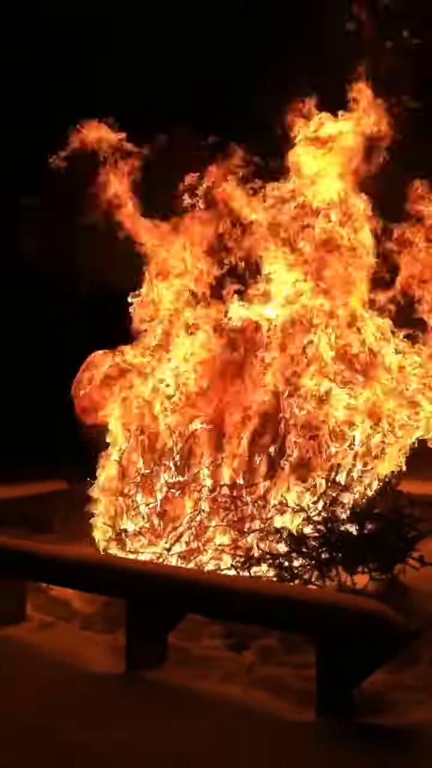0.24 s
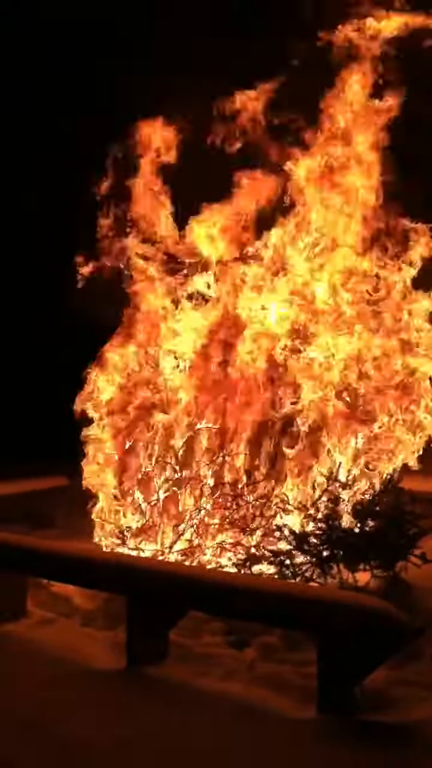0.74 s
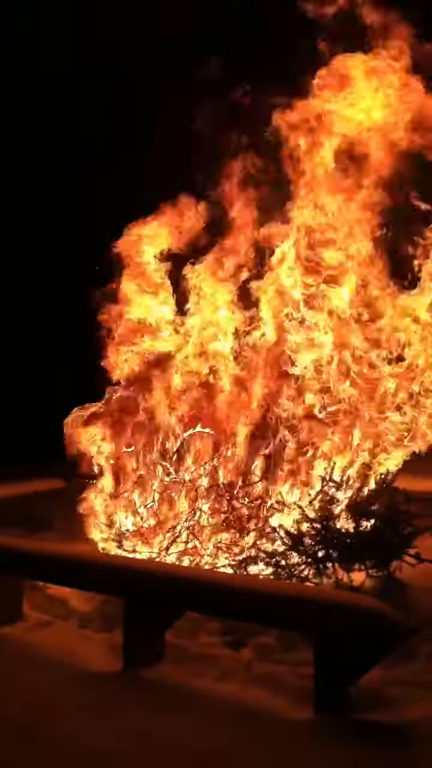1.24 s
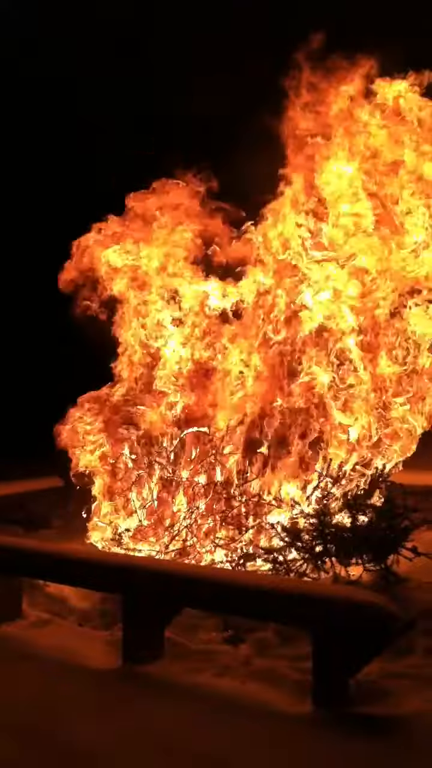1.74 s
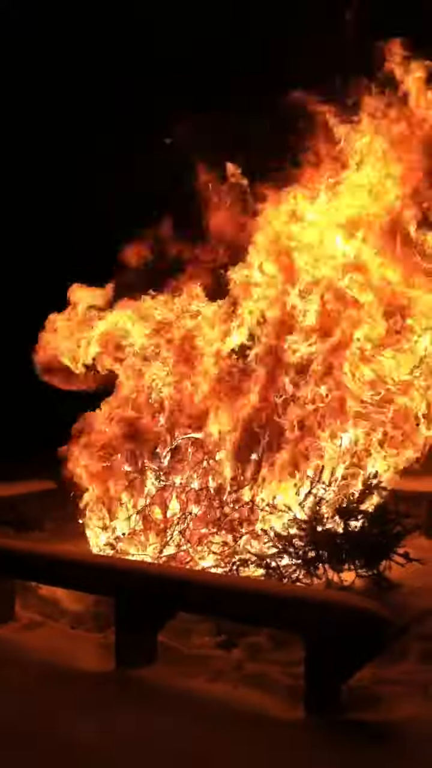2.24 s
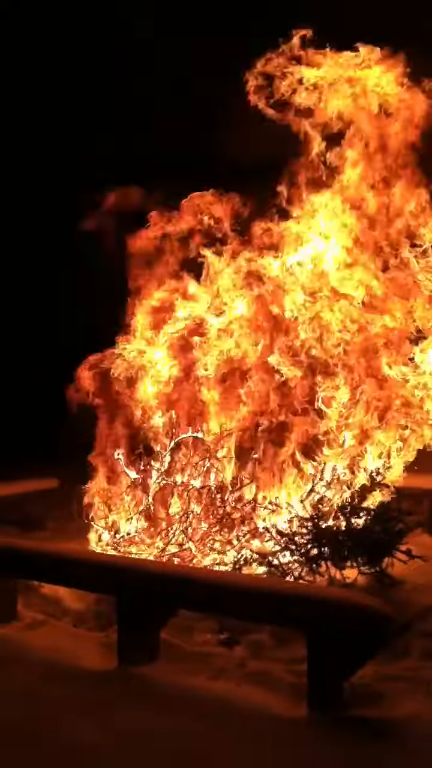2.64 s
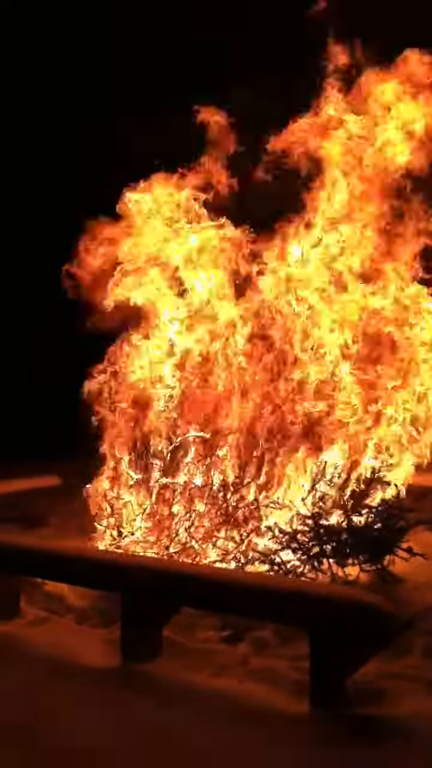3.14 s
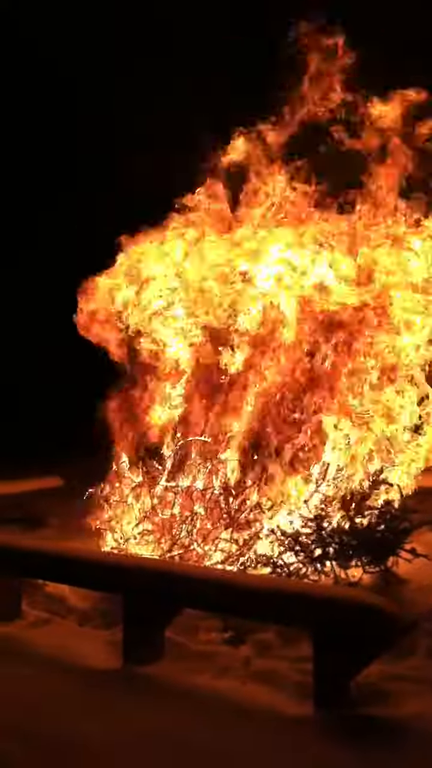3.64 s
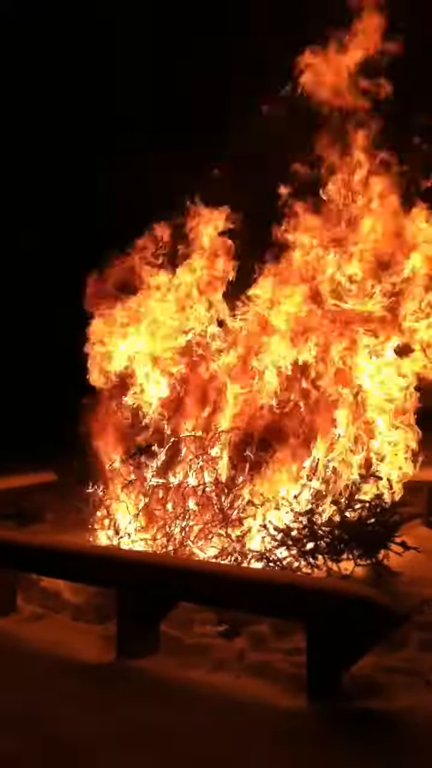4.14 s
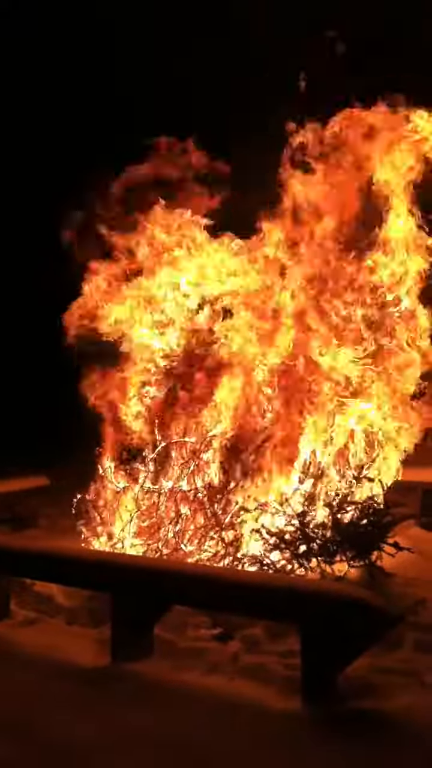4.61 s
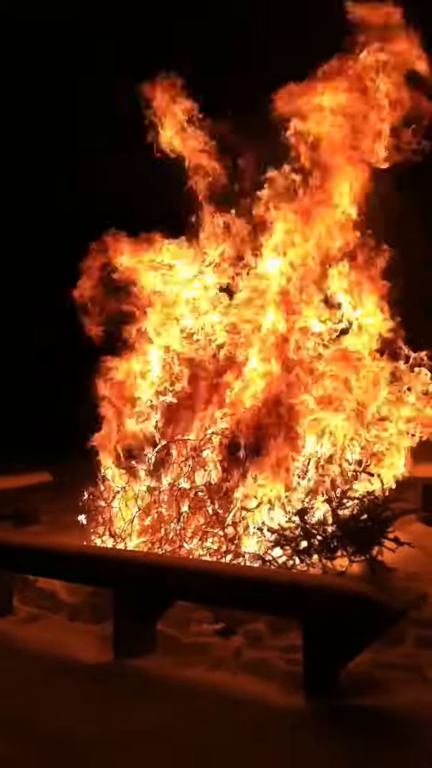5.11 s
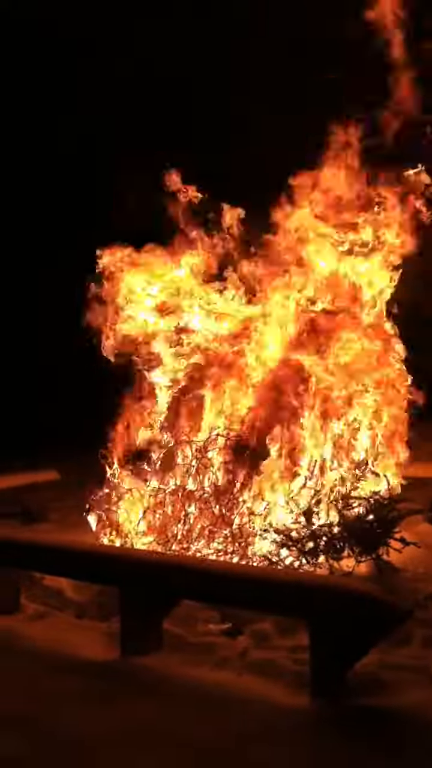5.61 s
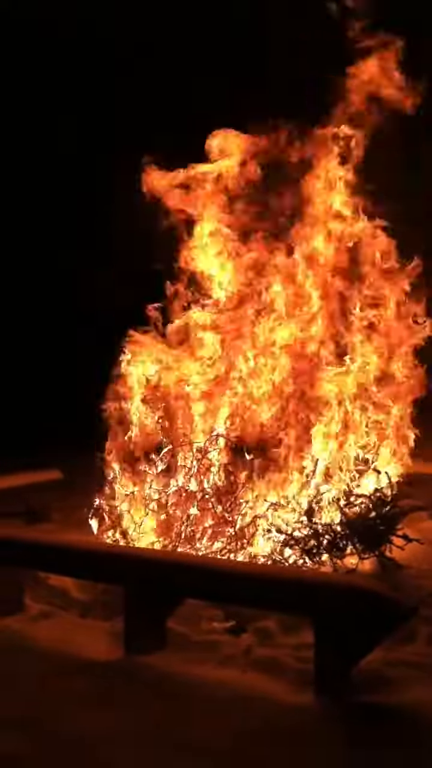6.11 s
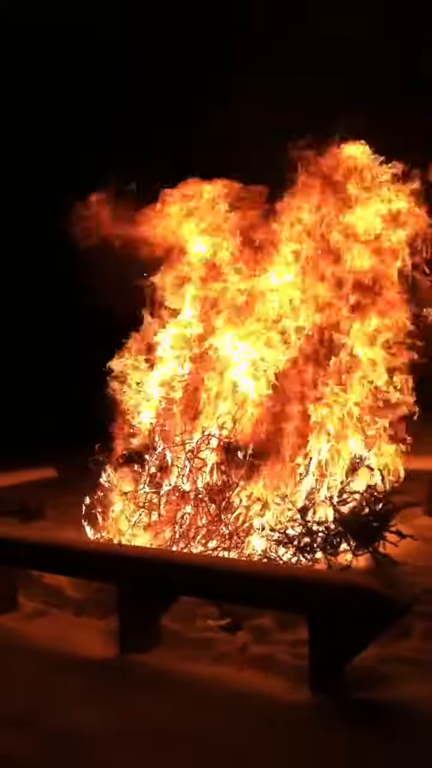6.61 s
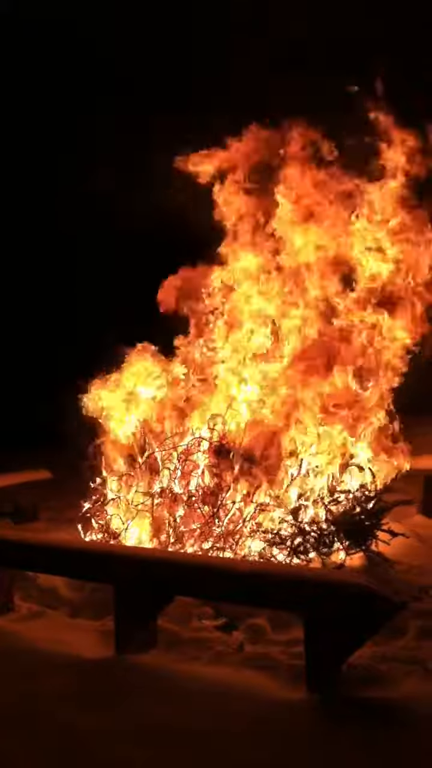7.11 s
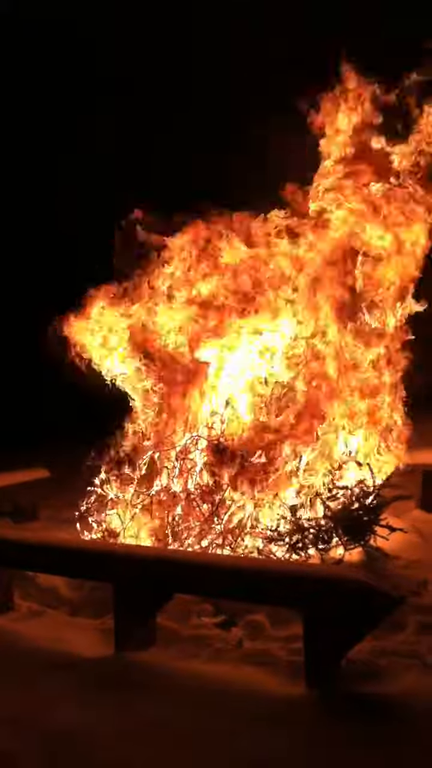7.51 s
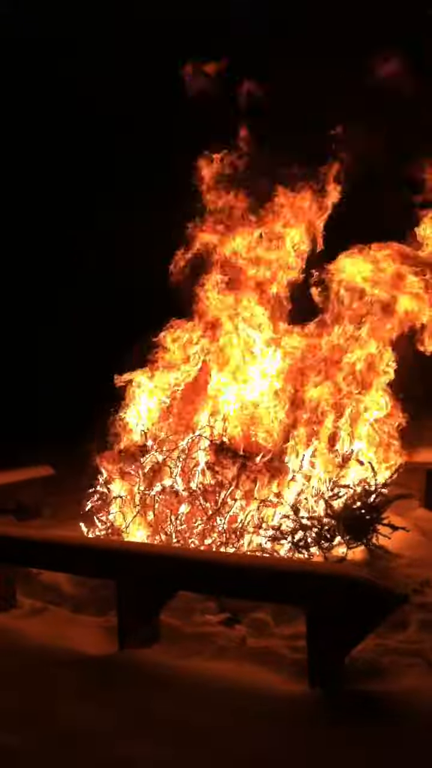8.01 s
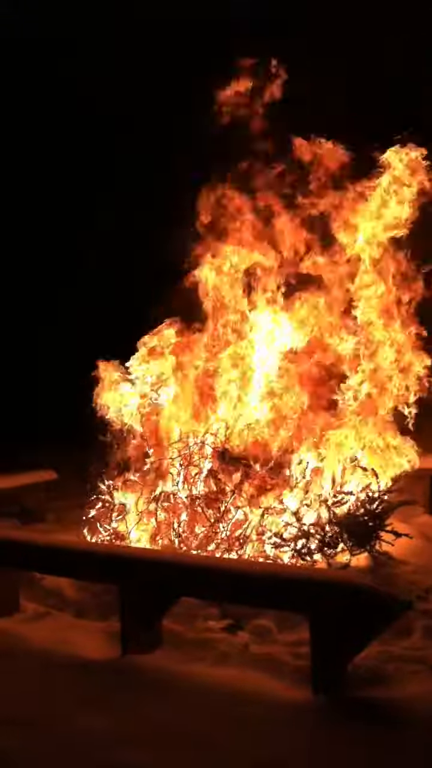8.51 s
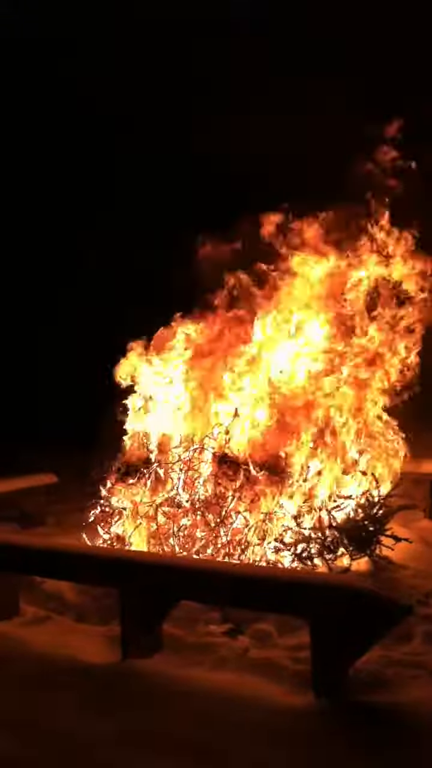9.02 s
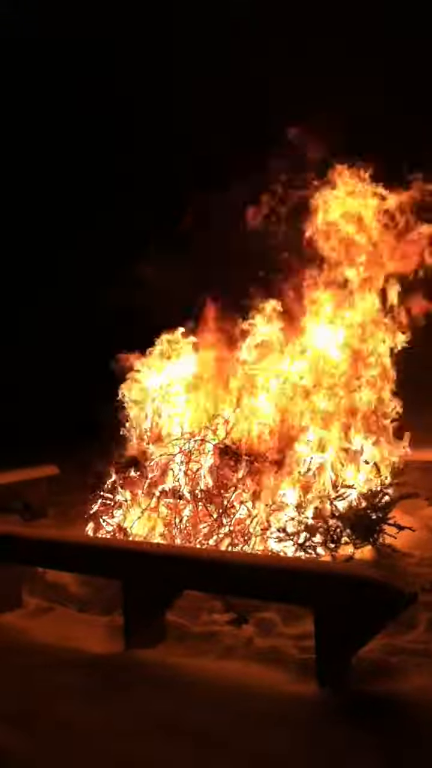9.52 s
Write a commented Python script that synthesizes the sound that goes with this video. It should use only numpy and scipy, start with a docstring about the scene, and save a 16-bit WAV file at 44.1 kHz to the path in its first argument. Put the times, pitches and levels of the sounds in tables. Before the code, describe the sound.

A dry conifer burns in a fire pit, needles fizzing and twigs crackling over a low rumble of flames, with occasional sharp pops.

```python
"""An outdoor fire pit, a few steps away: a dry conifer burns, peaks and slowly dies down.
Burning gas roars softly over the rumble of the draught; hot gas rushes through the branches.
Needles fizz with steam and tick, twigs snap, resin pockets pop and knock the wood.
All of it carries the hollow colour of the pit and its surroundings."""
import sys
import numpy as np
from scipy import signal
from scipy.fft import rfft, irfft, next_fast_len
from scipy.io import wavfile
from scipy.ndimage import map_coordinates

SR = 44100
rng = np.random.default_rng(int(sys.argv[2]) if len(sys.argv) > 2 else 0)


def digitize_waveform(pressure):
    """Quantize a signal to 16-bit integers and store it at the path in sys.argv[1].

    Rows of a 2-D input are taken as channels; values are limited to [-1, 1].
    """
    field = np.atleast_2d(pressure).T
    bounded = np.clip(field, -1, 1)
    quanta = np.round(bounded * 32767).astype(np.int16)
    wavfile.write(sys.argv[1], SR, quanta)


N = 429975


def amp(db):
    """Decibels to gain."""
    return 10 ** (np.asarray(db) / 20)


def unit(x):
    """x at rms 1."""
    return x / np.sqrt(np.mean(x ** 2) + 1e-20)


def wobble(rate_hz):
    """Smooth random curve, rate_hz knots a second."""
    knots = rng.standard_normal(int(N * rate_hz / SR) + 4)
    return map_coordinates(knots, [np.arange(N) * rate_hz / SR])


def curve(rows):
    """(time_s, value) rows interpolated per sample."""
    return np.interp(np.arange(N) / SR, *np.transpose(rows))


def blaze_db(time_s, peak_s=1.25, rise_db_per_s=0.65, sink_db_per_s=0.98):
    """Fire strength relative to its peak: swells, then sinks as the needles are used up."""
    return np.minimum(rise_db_per_s * (time_s - peak_s), sink_db_per_s * (peak_s - time_s))


def pit_response(spectrum, size):
    """Causal frequency response: a (freq_hz, level_db) spectrum plus the resonances around the fire."""
    # resonances: centre_hz, sigma_hz, gain_db
    hollow = [(855, 148, 6.5), (1566, 226, 8.5), (2523, 294, 8), (3030, 118, -3.5), (3430, 243, 5),
              (4070, 230, 2.5), (4770, 212, 6.5), (5080, 170, -4.5), (5950, 140, 2), (8710, 680, 2.5)]
    hz = np.fft.rfftfreq(size, 1 / SR)
    knot_hz, knot_db = np.transpose(spectrum)
    level_db = np.interp(np.log(hz + 1), np.log(knot_hz), knot_db)
    level_db += sum(db * np.exp(-.5 * ((hz - centre) / sigma) ** 2) for centre, sigma, db in hollow)
    # fold the cepstrum for minimum phase
    cepstrum = irfft(np.log(amp(level_db)))
    cepstrum[1:size // 2] *= 2
    cepstrum[size // 2 + 1:] = 0
    return np.exp(rfft(cepstrum))


def coloured(x, spectrum):
    """x shaped by the spectrum and the pit, at rms 1."""
    return unit(signal.fftconvolve(x, irfft(pit_response(spectrum, size=8192)))[:N])


def flames(trim_db=-0.75, surge_depth=0.84, flutter_db=1.0, draught_db=-8.5):
    """Burning gas flutters and surges as the flames billow; indrawn air rumbles along with it."""
    # flame surges: time_s, level_db
    surges = [(0, -46.5), (0.3, -46), (0.55, -46), (0.7, -44), (1.0, -47.9), (1.25, -45), (1.8, -47),
              (2.0, -47), (2.2, -49), (2.7, -47), (3.2, -47.5), (3.5, -46.1), (4.0, -48.6), (4.2, -46.5),
              (4.4, -49), (4.8, -46), (5.1, -49), (5.55, -49.5), (5.8, -47), (6.05, -49.5), (6.25, -47),
              (6.6, -50), (6.85, -48), (7.05, -50), (7.35, -47), (7.6, -49), (8.4, -51), (8.6, -49.5),
              (9.3, -50), (9.55, -47.9), (9.75, -49)]
    # roar spectrum: freq_hz, level_db
    gas_spectrum = [(60, -41), (110, -11.5), (160, -1), (210, 0.5), (300, -1.1), (400, -3.5), (600, -14.5),
                    (1000, -36)]
    # draught spectrum: freq_hz, level_db
    draught_spectrum = [(20, -31), (45, -35), (75, -13), (110, -6.5), (150, -0.5), (200, -10.5), (400, -44)]
    surge_db = curve(surges)
    roar_db = trim_db + surge_db.mean() + surge_depth * (surge_db - surge_db.mean())
    gas = amp(flutter_db * wobble(20)) * coloured(rng.standard_normal(N), gas_spectrum)
    draught = amp(draught_db) * coloured(rng.standard_normal(N), draught_spectrum)
    return amp(roar_db) * (gas + draught)


def updraught(peak_db=-52, follow=0.3):
    """Hot gas streams through the branches, pitched above the roar, easing as the blaze sinks."""
    # rush spectrum: freq_hz, level_db
    spectrum = [(200, -14.5), (400, 0.5), (600, -1), (1000, -2.5), (1600, -14.5), (3000, -19.5),
                (8000, -45)]
    level_db = peak_db + follow * blaze_db(np.arange(N) / SR)
    return amp(level_db) * coloured(rng.standard_normal(N), spectrum)


def needles(trim_db=-1.0, base_rate_hz=4500, spread_db=5, steam_gain=0.69, flicker_db=1.22):
    """Tiny needle bursts merge with escaping steam; sparser and grainier as the hiss weakens."""
    # needle flare-ups: time_s, level_db
    flares = [(0.0, -43), (1.11, -42.5), (1.36, -41.5), (1.82, -43), (2.15, -42.5), (2.44, -43),
              (2.71, -43), (3.96, -45.5), (5.0, -43.5), (5.29, -45.5), (5.89, -43.5), (7.17, -48),
              (7.3, -46.5), (8.15, -49.5), (8.25, -47.5), (8.63, -46.5), (9.04, -49.5), (9.75, -48.5)]
    # fizz spectrum: freq_hz, level_db
    spectrum = [(300, -10.5), (1000, -6), (2000, -7.5), (3500, -3.5), (5500, 1.5), (8000, 2.5), (9200, -2),
                (10200, -3), (13000, -8.3), (15500, -18.5)]
    hiss_db = trim_db + curve(flares)
    activity = amp(hiss_db - hiss_db.mean()) ** 2
    sizes = amp(spread_db * np.minimum(rng.standard_normal(N), 2)) * rng.choice([-1, 1], N)
    bursting = rng.random(N) < activity * base_rate_hz / SR
    bursts = unit(sizes * bursting / np.sqrt(activity))
    steam = steam_gain * rng.standard_normal(N)
    level_db = hiss_db + flicker_db * (wobble(35) + wobble(110))
    return amp(level_db) * coloured(bursts + steam, spectrum)


def cracks(times_s, energy_db, centre_hz, q, noise_gain, tail_t60_s, lead_in_t60_s, knock=0, size=512):
    """A faint noise swells just before each snap and fades after; a cavity and knocked wood ring."""
    # wood modes: mode_hz, width_hz, gain_db
    modes = [(2580, 530, 1), (3460, 350, -4), (4950, 280, -17), (7900, 1100, -3)]
    # snap spectrum: freq_hz, level_db
    spectrum = [(200, -7), (900, -2), (1600, -5), (2500, -5.5), (3500, -4.5), (5000, -0.5), (7600, 1),
                (9200, -2), (10200, -6), (13000, -10), (15500, -20)]
    lead = size // 4
    t = (np.arange(size) - lead) / SR
    envelope = amp(-60 * np.maximum(t / tail_t60_s, -t / lead_in_t60_s))
    drive = noise_gain * rng.standard_normal((len(times_s), size)) * envelope
    drive[:, lead] = 1  # the snap itself
    hz = np.fft.rfftfreq(size, 1 / SR)
    ratio = hz / centre_hz[:, None]  # bigger cavity, lower band
    cavity = (1j * ratio / (1j * ratio + q[:, None] * (1 - ratio ** 2))) ** 2
    wood = sum(amp(db) * 1j * hz * width_hz / (mode_hz ** 2 - hz ** 2 + 1j * hz * width_hz)
               for mode_hz, width_hz, db in modes)
    waves = irfft(rfft(drive) * cavity * (1 + knock * wood) * pit_response(spectrum, size))
    waves *= (amp(energy_db) / np.linalg.norm(waves, axis=1))[:, None]
    indices = (times_s * SR).astype(int)[:, None] + np.arange(size)
    return np.bincount(indices.ravel(), waves.ravel(), N + lead)[lead:lead + N]


def spurt_times(count, clump_db=2.0, follow=0.45):
    """Random times in spurts as sprig after sprig catches, denser in a fierce blaze."""
    t = np.arange(N) / SR
    burnt = np.cumsum(amp(follow * blaze_db(t) + clump_db * wobble(22)) ** 2)
    return np.interp(rng.random(count), burnt / burnt[-1], t)


def twigs(level_db=-49, follow=0.35, spread_db=5.0, centre_hz=5600, pitch_spread=0.36, count=2100):
    """Twigs deep in the fire give way in dry snaps of unequal size and pitch."""
    times_s = spurt_times(count)
    size, pitch = rng.standard_normal((2, count))
    energy_db = spread_db * np.minimum(size, 1.4)
    pitch_hz = centre_hz * np.exp(pitch_spread * pitch)
    snaps = cracks(times_s, energy_db, pitch_hz, q=np.full(count, 0.74),
                   noise_gain=0.22, tail_t60_s=0.0051, lead_in_t60_s=0.0034)
    return amp(level_db + follow * blaze_db(np.arange(N) / SR)) * unit(snaps)


def needle_ticks(base_db=-20.0, spread_db=2.0, centre_hz=12500, pitch_spread=0.18, count=400):
    """Near-side needles split with dry, bright ticks, stronger in a fierce blaze."""
    times_s = rng.uniform(0, N / SR, count)
    size, pitch = rng.standard_normal((2, count))
    energy_db = base_db + spread_db * np.minimum(size, 1.4) + blaze_db(times_s)
    pitch_hz = centre_hz * np.exp(pitch_spread * pitch)
    return cracks(times_s, energy_db, pitch_hz, q=np.full(count, 0.6),
                  noise_gain=0.27, tail_t60_s=0.014, lead_in_t60_s=0.002)


def pops():
    """Resin pockets and thick twigs burst clear of the crackle; heavier pops knock the wood more."""
    # bursts: time_s, energy_db, centre_hz, q
    bursts = [(0.2022, -18, 11300.0, 0.28), (0.3562, -14, 7500.0, 1.18), (0.3827, -15.5, 5200.0, 0.87),
              (0.6389, -10.5, 4200.0, 0.26), (0.7278, -12, 8400.0, 0.6), (0.779, -11, 7000.0, 1.0),
              (0.8002, -8.5, 6200.0, 0.38), (0.8388, -11, 6900.0, 1.2), (1.1041, -12, 6300.0, 0.4),
              (1.1414, -14, 6900.0, 0.56), (1.198, 1.5, 5600, 0.56), (1.466, -12, 5600.0, 0.54),
              (1.4983, -13, 11000.0, 0.28), (1.5173, -13, 10900.0, 0.39), (1.5862, -13, 6200.0, 0.34),
              (1.668, -12.5, 5400.0, 0.28), (1.7805, -15.5, 6600.0, 0.66), (1.7985, -14.5, 1900, 0.49),
              (1.8943, -11, 6900.0, 0.48), (1.9213, -12, 6900.0, 0.36), (2.1037, -11, 6100.0, 0.69),
              (2.117, -14, 6600.0, 0.54), (2.141, -10, 8200.0, 0.5), (2.1558, -14, 4400.0, 0.51),
              (2.3212, -10, 5600.0, 0.28), (2.4587, -11, 12600.0, 0.38), (2.5181, -16, 10500.0, 0.28),
              (2.626, -5, 7800.0, 0.65), (2.655, -14, 6700.0, 0.56), (2.737, -11, 6500.0, 0.66),
              (3.0244, -5.5, 9400.0, 0.31), (3.041, -14, 11700.0, 0.21), (3.1705, -16.0, 7500.0, 1.35),
              (3.1988, -10, 5940, 0.64), (3.2179, -14, 13100.0, 0.56), (3.374, -16, 13100.0, 0.4),
              (3.4056, -14, 10900.0, 0.28), (3.4523, -14.5, 7200.0, 0.66), (3.5621, -8, 4830, 0.69),
              (3.5653, -16.5, 1900.0, 0.33), (3.6755, -12, 8400.0, 0.38), (3.7103, -10.5, 6900.0, 0.36),
              (3.879, -12.5, 3700.0, 0.28), (3.8996, -15, 5700.0, 0.3), (3.936, -8.5, 7600.0, 0.93),
              (3.9927, -17, 2100.0, 0.93), (4.0373, -16, 13100.0, 0.59), (4.063, -15, 7700.0, 0.4),
              (4.3568, -12.5, 7300.0, 0.56), (4.718, -17.5, 7900.0, 0.86), (4.8515, -15, 5100.0, 0.32),
              (4.876, -14.5, 6100.0, 0.38), (5.0268, -10.5, 3100.0, 0.28), (5.2235, -12.0, 3200.0, 0.48),
              (5.4845, -14, 7300.0, 0.28), (6.026, 0, 2680, 0.54), (6.0262, -6, 4870, 3.2),
              (6.0776, -17, 4000.0, 0.9), (6.1844, -19, 6800.0, 0.98), (6.2527, -9.5, 3800.0, 0.26),
              (6.3288, -16, 8300.0, 0.28), (6.385, -13.5, 4800.0, 0.88), (6.523, -14, 6400.0, 0.63),
              (6.5323, -22, 4900.0, 1.09), (6.573, -19, 2900.0, 0.25), (6.6622, -16, 3500.0, 0.26),
              (6.8767, -19, 6500.0, 0.28), (6.905, -19.5, 2100.0, 0.28), (7.1047, -17.5, 5470, 0.8),
              (7.1338, -18.5, 13100.0, 0.27), (7.2213, -14, 5900.0, 1.6), (7.2657, -7.5, 5800.0, 0.68),
              (7.4115, -18.0, 9900.0, 0.27), (7.4612, -11, 5700.0, 0.52), (7.611, -15.5, 9000.0, 0.39),
              (7.6505, -13.5, 7900.0, 0.48), (7.705, -19.0, 5000.0, 0.42), (7.7322, -11, 2600, 0.55),
              (7.8196, -17, 12500.0, 0.28), (7.8483, -9.5, 13100.0, 0.83), (7.8671, -13.5, 5100.0, 0.31),
              (7.979, -17.0, 6300.0, 0.22), (7.9848, -13, 4250, 0.19), (8.086, -18, 2600.0, 0.28),
              (8.1075, -15, 8500.0, 0.55), (8.1405, -5.5, 4400.0, 1.1), (8.1494, -14.5, 6900.0, 0.4),
              (8.175, -13.5, 5870, 0.88), (8.2435, -18, 4600.0, 0.98), (8.2683, -13, 4300.0, 0.6),
              (8.2738, -14.5, 13100.0, 0.21), (8.3693, -14.5, 1600.0, 0.21), (8.4017, -11.5, 5700.0, 0.45),
              (8.4831, -16.0, 13100.0, 0.69), (8.5944, -15.5, 8300.0, 0.33), (8.611, -16.5, 4000.0, 0.94),
              (8.727, -17, 11100.0, 1.1), (8.7695, -12, 2700, 0.39), (8.785, -15.5, 13100.0, 0.53),
              (8.935, -17, 13000.0, 0.3), (9.0313, -16, 7400.0, 0.38), (9.0525, -11, 8800.0, 0.63),
              (9.0623, -15, 13100.0, 0.25), (9.125, -14, 3400.0, 0.24), (9.1508, -13.5, 9000.0, 0.2),
              (9.1981, -19, 13100.0, 0.25), (9.2444, -19, 6900.0, 1.4), (9.2865, -14.5, 13100.0, 0.49),
              (9.3018, -14.0, 5400.0, 0.87), (9.4563, -10.0, 5360, 0.41), (9.4876, -21, 5800.0, 0.49),
              (9.5516, -16, 3000.0, 0.35), (9.5549, -15, 7700.0, 0.36), (9.62, -19, 6140, 0.38),
              (9.6335, -16, 8800.0, 0.33), (9.6791, -13, 7400.0, 0.44), (9.6958, -19, 4900.0, 0.3)]
    times_s, energy_db, centre_hz, q = np.transpose(bursts)
    return cracks(times_s, energy_db, centre_hz, np.clip(q, 0.15, 3),
                  noise_gain=0.07, tail_t60_s=0.012, lead_in_t60_s=0.0056, knock=amp(energy_db)[:, None])


def outdoors(x, scatter_db=-15, t60_s=0.048):
    """Nearly dry open air: x plus a faint, short scatter from pit and yard."""
    t = np.arange(SR // 4) / SR
    scatter = rng.standard_normal(len(t)) * amp(-60 * t / t60_s)
    scatter *= amp(scatter_db) / np.linalg.norm(scatter)
    return x + signal.fftconvolve(x, scatter)[:N]


def scene():
    """Roar, rush and fizz with crackle on top; mono."""
    bed = flames() + updraught() + needles()
    crackle = twigs() + needle_ticks() + pops()
    return (bed + outdoors(crackle))[None]


def record(dry, top_hz=15800):
    """Microphone chain: nothing passes above its band limit."""
    size = next_fast_len(N + SR // 2)
    passband = np.fft.rfftfreq(size, 1 / SR) < top_hz
    return irfft(rfft(dry, size) * passband, size)[:, :N]


dry = scene()
out = record(dry)
digitize_waveform(out)
```